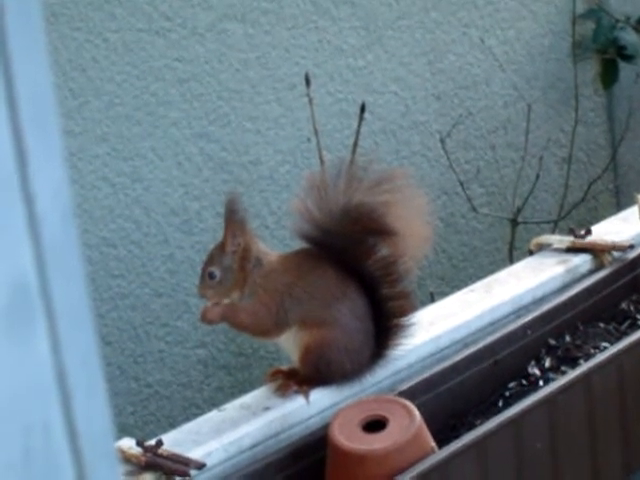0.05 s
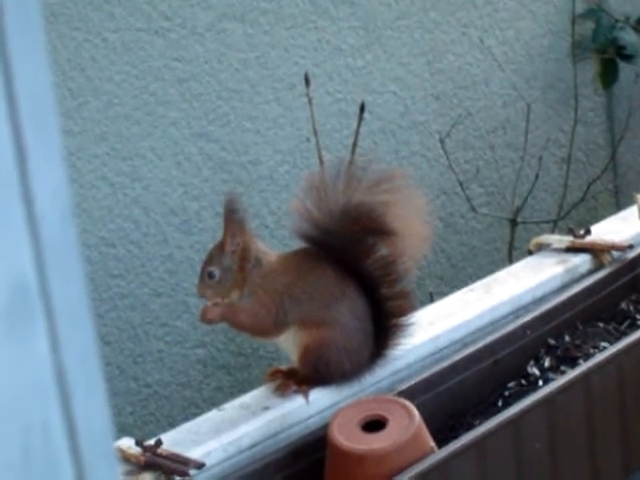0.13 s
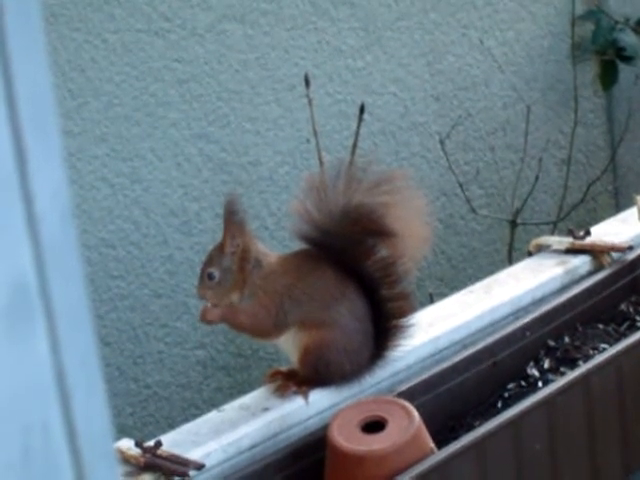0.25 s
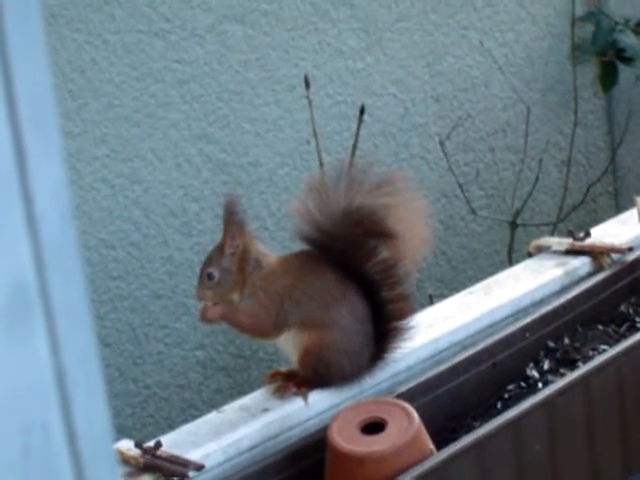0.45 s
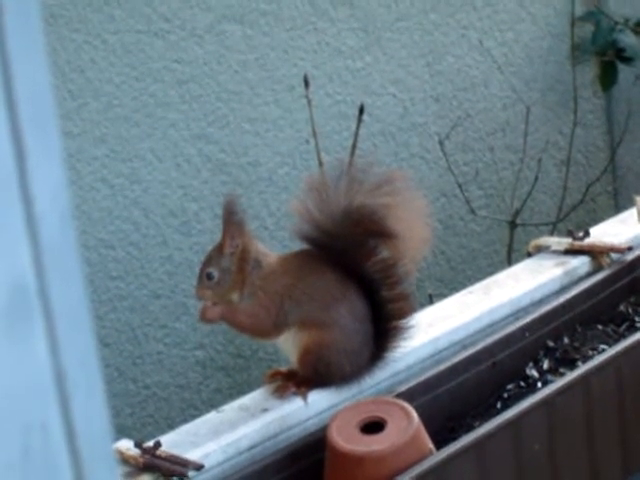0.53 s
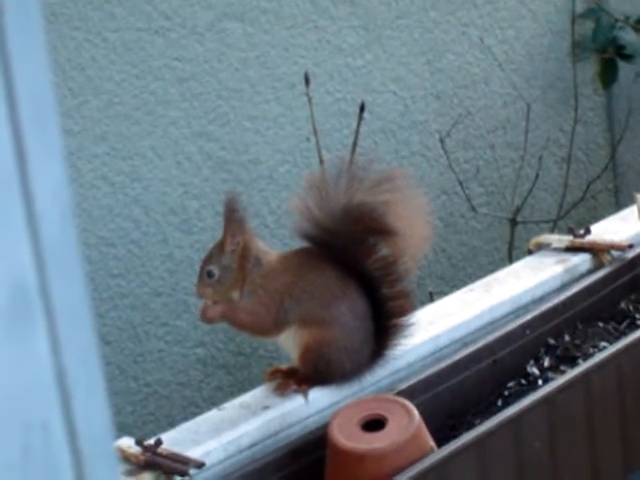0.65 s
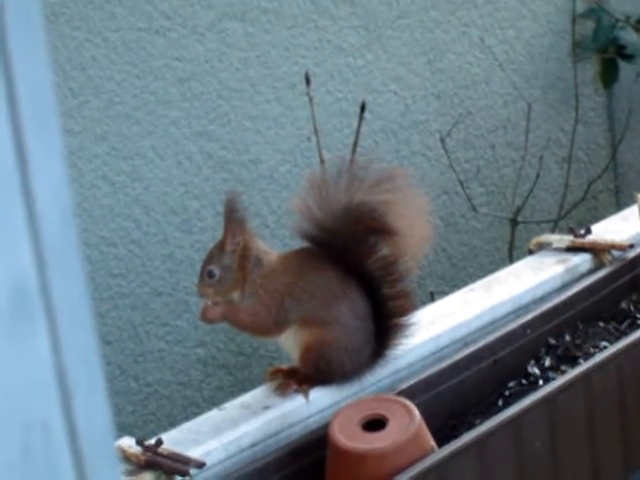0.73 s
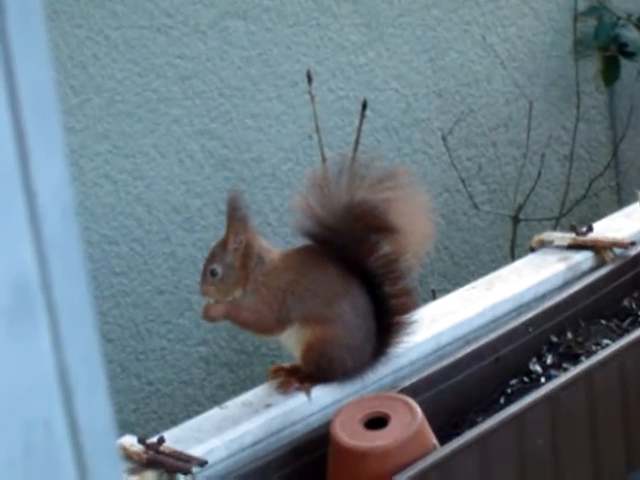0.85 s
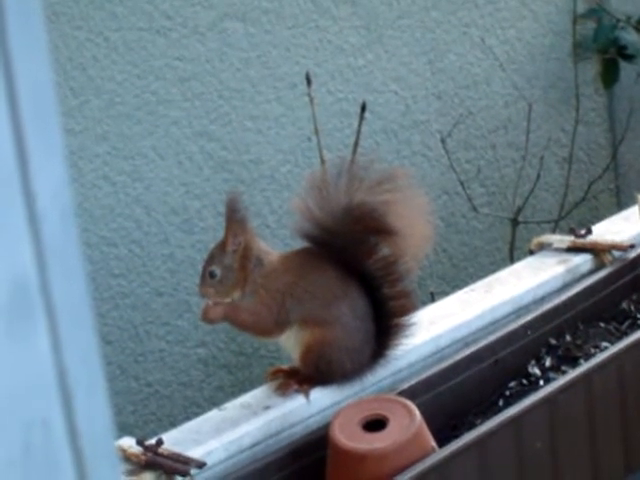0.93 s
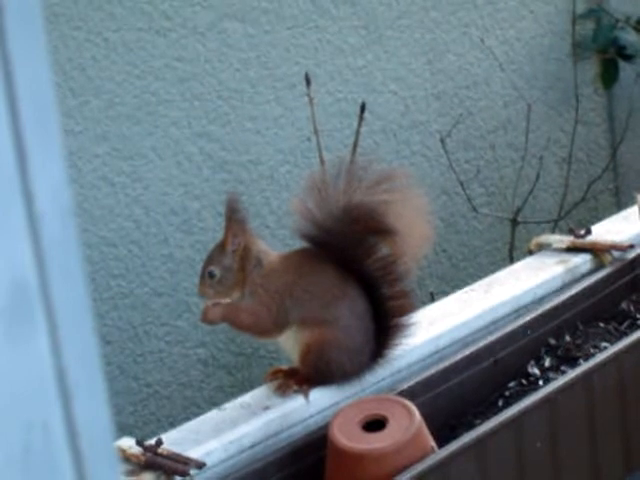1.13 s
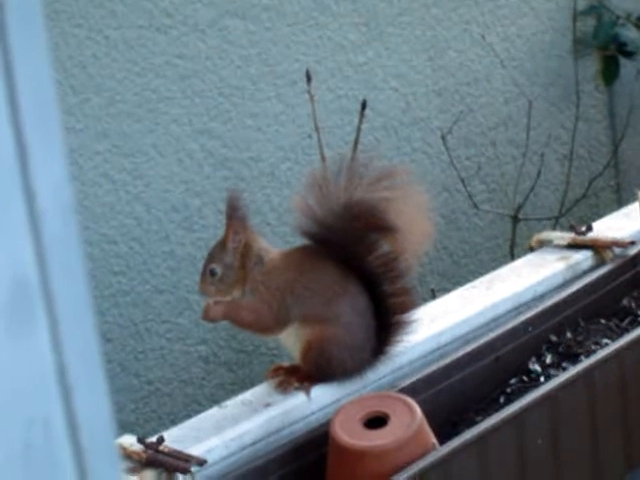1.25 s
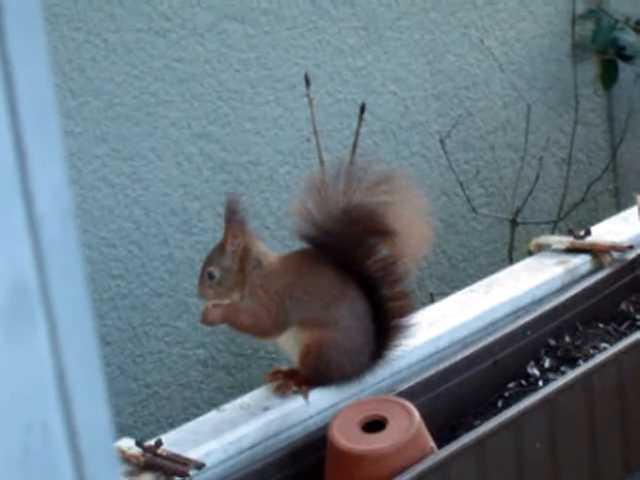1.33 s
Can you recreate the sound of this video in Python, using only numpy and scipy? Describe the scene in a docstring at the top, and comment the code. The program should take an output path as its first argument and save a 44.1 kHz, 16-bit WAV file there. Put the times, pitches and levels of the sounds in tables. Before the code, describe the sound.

One sharp dry click close by, with a brief hollow ring, over quiet outdoor rumble and hiss

```python
"""A distant outdoor rumble, a faint wavering hum and a steady microphone hiss are heard first, on a quiet balcony.
Then one sharp, dry click sounds close by, like a small plastic catch snapping: a faint lead-in tick, one hard
contact and two tiny rebounds, then a brief hollow ring of the casing and a weak tail from the balcony wall.
Rumble, hiss and tail are coloured noise; the hum is two low sines that waver in loudness and phase.
Click and casing are fading sines, and each contact adds a short crack of noise."""
import sys
import numpy as np
from scipy.fft import rfft, irfft, next_fast_len
from scipy.io import wavfile
from scipy.ndimage import map_coordinates

SR = 44100
rng = np.random.default_rng(int(sys.argv[2]) if len(sys.argv) > 2 else 0)


def unload_audio(sound):
    """Save the sound as a 16-bit wav file, at the path given as the first command line argument."""
    columns = np.transpose(np.atleast_2d(sound))
    # keep every value between -1 and 1, then stretch to whole-number steps
    steps = np.round(np.clip(columns, -1, 1) * 32767)
    wavfile.write(sys.argv[1], SR, steps.astype(np.int16))


N = 61739  # length of the scene in samples, 1.4 s
TOP_HZ = 10130  # nothing is kept at or above this frequency


def amp(db):
    """Turn decibels into a gain."""
    return 10 ** (np.asarray(db) / 20)


def unit(x):
    """Scale x to an rms of 1."""
    return x / np.sqrt(np.mean(x ** 2) + 1e-20)


def since(start_s):
    """Seconds passed since start_s, zero before it."""
    return np.maximum(np.arange(N) / SR - start_s, 0)


def fade(t, rise, t60):
    """A quick rise (time constant [s]), then a decay that loses 60 dB in t60 seconds."""
    growth = 1 - np.exp(-t / rise)
    decay = np.exp(-np.log(1000) * t / t60)
    return growth * decay


def wobble(rate):
    """A smooth random curve shaped by `rate` random points a second."""
    points = rng.standard_normal(256)
    return map_coordinates(points, [np.arange(N) * rate / SR], mode="wrap")


def filtered(x, response):
    """Multiply the spectrum of x by a response that depends on frequency."""
    size = next_fast_len(N + 8192)  # spare room so the end does not wrap onto the start
    hz = np.fft.rfftfreq(size, 1 / SR)
    return irfft(rfft(x, size) * response(hz), size)[:N]


def noise(spectrum):
    """Random noise of rms 1, coloured by (frequency, level) points and cut off at TOP_HZ."""
    point_hz, point_db = np.transpose(spectrum)

    def colour(hz):
        level_db = np.interp(np.log(hz + 1), np.log(point_hz), point_db)
        return amp(level_db) * (hz < TOP_HZ)

    return unit(filtered(rng.standard_normal(N), colour))


def ring(modes, t, rise):
    """A struck part rings as several sines at once, each fading at its own speed."""
    out = np.zeros(N)
    for hz, db, t60 in modes:
        out += amp(db) * fade(t, rise, t60) * np.sin(2 * np.pi * hz * t)
    return out


# How loud the distant rumble is over time: (time [s], level [dB])
RUMBLE_LOUDNESS = [(0, -63.5), (.35, -61.5), (.46, -65.5), (.63, -60), (.72, -62.5), (.79, -64),
                   (1.05, -63.5), (1.22, -64), (1.4, -60)]
# Colour of the rumble: (frequency [Hz], relative level per Hz [dB])
RUMBLE_COLOUR = [(20, -17.5), (50, -7.5), (90, -3), (140, -4.5), (280, 3), (400, -4), (800, -7),
                 (1500, -18), (4000, -32.5)]


def distant_rumble(flutter_db=1.2):
    """Low-pitched noise that swells unevenly, with small random changes of level on top."""
    level_db = np.interp(since(0), *np.transpose(RUMBLE_LOUDNESS))
    return amp(level_db + flutter_db * wobble(34.9)) * noise(RUMBLE_COLOUR)


# Tones of the faint hum: (frequency [Hz], rms level [dB])
HUM_TONES = [(130.5, -74.5), (196, -72.5)]


def faint_hum(waver_db=3, drift_rad=.35):
    """Two low sines whose loudness and phase waver at random."""
    out = np.zeros(N)
    for hz, db in HUM_TONES:
        loudness = amp(waver_db * wobble(12.14))
        phase = 2 * np.pi * hz * since(0) + drift_rad * wobble(9.2)
        out += amp(db) * unit(loudness * np.sin(phase))
    return out


HISS_DB = -63  # rms level
# Colour of the hiss: (frequency [Hz], relative level per Hz [dB])
HISS_COLOUR = [(20, -16), (200, 0), (1000, 4.5), (2000, 1.5), (4000, -1.5), (7000, -2), (10000, -4)]


def microphone_hiss():
    """The microphone's own noise, steady throughout."""
    return amp(HISS_DB) * noise(HISS_COLOUR)


WALL_DB, WALL_RISE_S, WALL_T60_S = -51.5, .0028, .24
# Colour of the wall's tail: (frequency [Hz], relative level [dB])
WALL_COLOUR = [(150, -14), (600, 19), (1100, 0), (1700, -17), (3000, -26), (10000, -40)]


def wall_tail():
    """The balcony wall returns a weak tail of the main contact, as fading noise."""
    envelope = fade(since(MAIN_CONTACT_S), WALL_RISE_S, WALL_T60_S)
    return amp(WALL_DB) * envelope * noise(WALL_COLOUR)


CASING_DELAY_S, CASING_RISE_S = .00291, .0093
# Tones of the hollow casing: (frequency [Hz], level before its fade shape [dB], time to fall 60 dB [s])
CASING_TONES = [(100, -44.5, .09), (168, -30, .031), (543, -19, .032), (686, -11.9, .0235)]


def casing_ring():
    """The main contact sets the casing ringing hollowly, a moment later and with a softer start."""
    return ring(CASING_TONES, since(MAIN_CONTACT_S + CASING_DELAY_S), CASING_RISE_S)


ATTACK_S = .0005  # rise time constant of each contact
CRACK_DB, CRACK_T60_S = -37, .014  # crack level relative to its contact, before fade shape and bass cut
LOW_CUT_HZ = 291  # the bass weakens below this
# Contacts of the snap, a tick, the hard hit and two rebounds: (time [s], relative level [dB])
CONTACT_HITS = [(.24216, -23.8), (.24463, 0), (.24584, -16.3), (.24927, -22.8)]
MAIN_CONTACT_S = CONTACT_HITS[1][0]
# Tones of the snapping part: (frequency [Hz], level before fade shape and bass cut [dB], time to fall 60 dB [s])
SNAP_TONES = [(395, -17, .006), (1087, -21.5, .0139), (1237, -22.5, .0183), (1677, -10.5, .0115),
              (1691, -10, .0039), (2020, -27.5, .0208), (2225, -19, .0155), (2352, -29.5, .0148),
              (2712, -29.4, .017), (3258, -23.5, .0077), (4641, -38, .0122), (6131, -43, .0135),
              (6374, -42.4, .012), (8031, -35.5, .0066)]
# Colour of the crack, before the bass cut: (frequency [Hz], relative level [dB])
CRACK_COLOUR = [(300, -24), (1500, 6.5), (3500, 10), (5500, -13), (10000, -2.5)]


def click():
    """Each contact rings the same short tones and adds a crack; the click carries little bass."""
    out = np.zeros(N)
    for contact_s, db in CONTACT_HITS:
        t = since(contact_s)
        tones = ring(SNAP_TONES, t, ATTACK_S)
        crack = amp(CRACK_DB) * fade(t, ATTACK_S, CRACK_T60_S) * noise(CRACK_COLOUR)
        out += amp(db) * (tones + crack)

    def bass_cut(hz):
        return (1j * hz / (LOW_CUT_HZ + 1j * hz)) ** 2

    return filtered(out, bass_cut)


def scene():
    """Add the click and its after-sounds to the background, as one channel."""
    background = distant_rumble() + faint_hum() + microphone_hiss()
    snap = wall_tail() + casing_ring() + click()
    return (background + snap)[None]


def record(dry):
    """The camera keeps nothing above its band limit."""
    return np.array([filtered(channel, lambda hz: hz < TOP_HZ) for channel in dry])


dry = scene()
out = record(dry)
unload_audio(out)
```